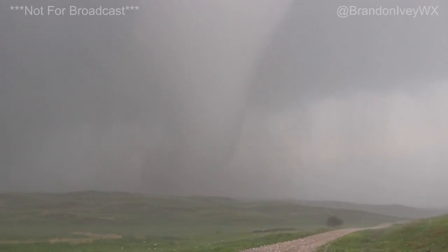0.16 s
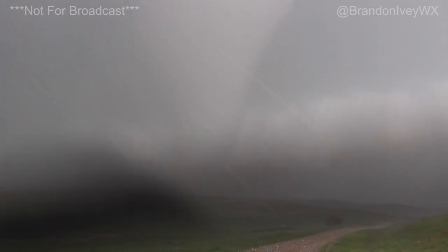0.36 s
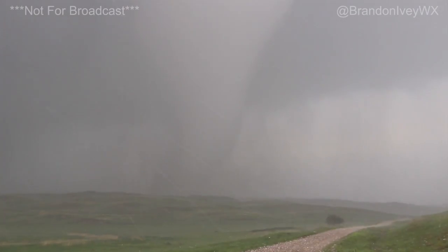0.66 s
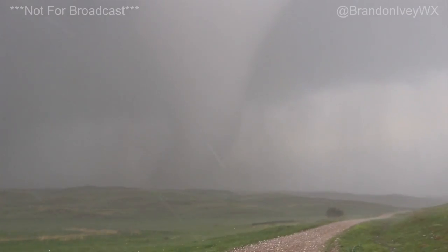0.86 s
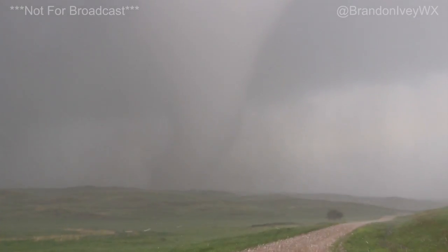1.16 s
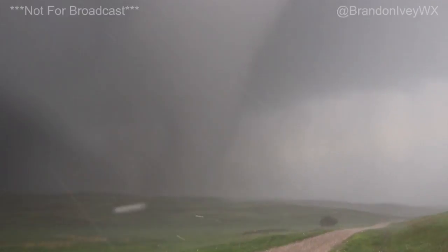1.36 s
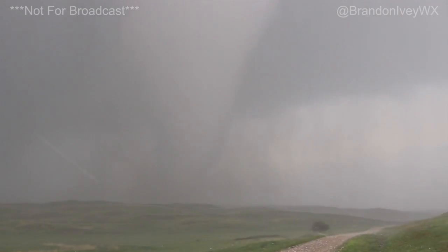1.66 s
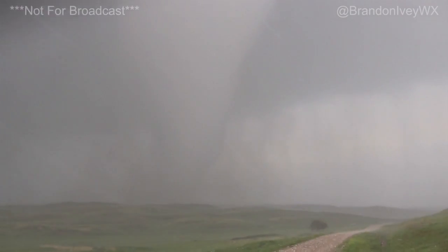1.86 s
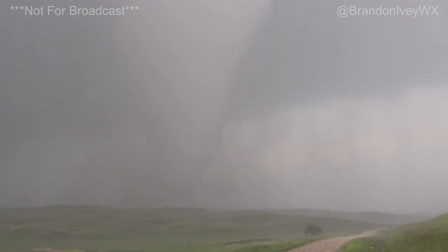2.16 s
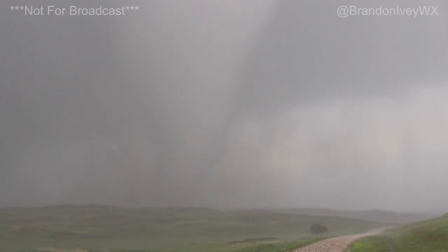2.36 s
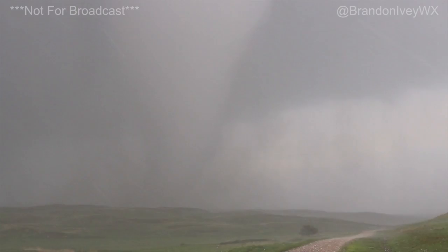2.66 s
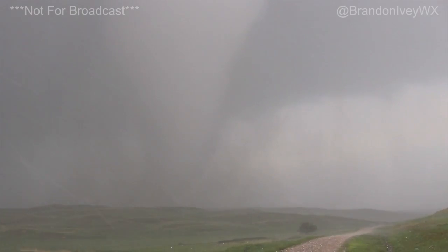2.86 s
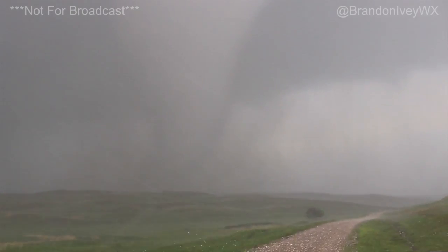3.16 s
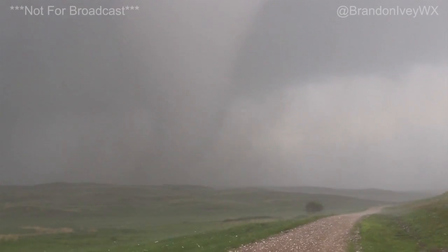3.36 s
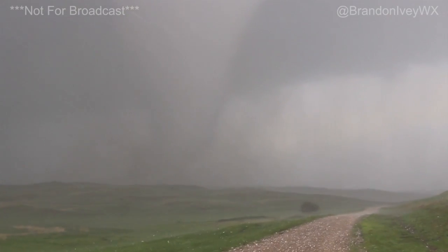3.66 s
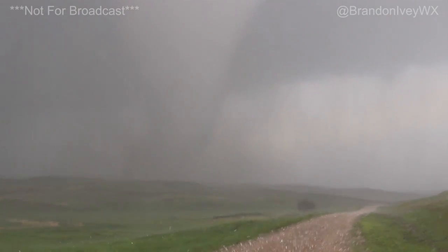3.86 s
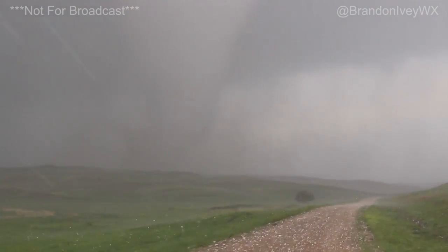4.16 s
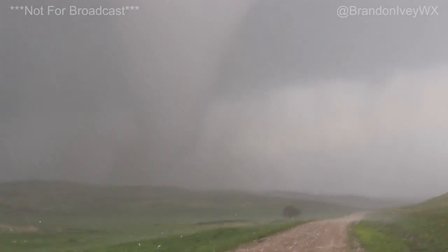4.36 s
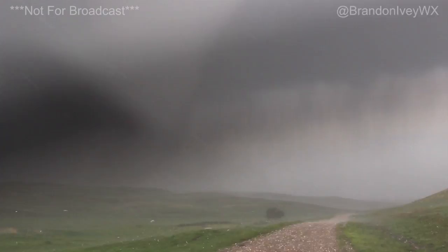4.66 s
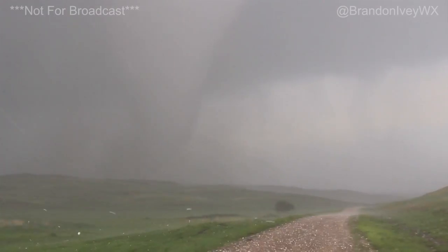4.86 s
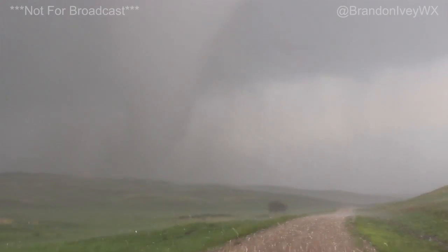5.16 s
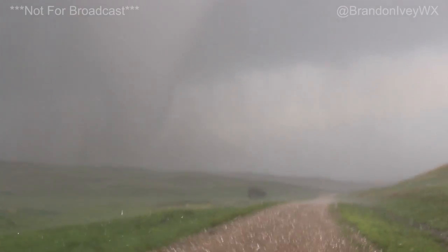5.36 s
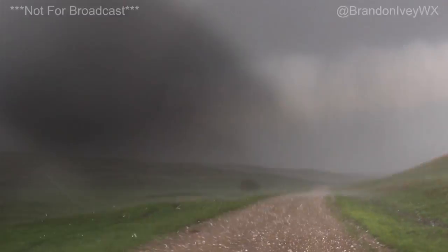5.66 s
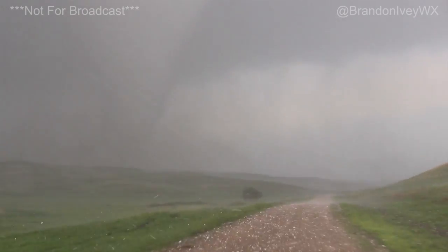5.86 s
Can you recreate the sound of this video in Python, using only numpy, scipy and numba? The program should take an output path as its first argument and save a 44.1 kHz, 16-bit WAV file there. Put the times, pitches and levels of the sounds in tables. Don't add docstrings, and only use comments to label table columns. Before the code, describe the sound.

Inside a parked car during a hailstorm, the microphone sits in the cabin close to the roof and glass. Wind booms low and unsteady from the start, with faint rain patter and wet hiss. Hail hits immediately: a roof knock at 0.0 s, a glass crack near 0.3, then heavy roof bangs around 0.6, 0.7 and 1.0 and a hard glass hit at 1.2. A sparser spell of light ticks follows until sharp strikes at 1.9, 2.2, 2.3 and 2.5. Gusts swell around 3 to 4 s as loud blows land at 3.1, 3.6 and 4.0. At 4.5 a piercing glass crack is among the loudest. More bangs come at 5.2, 5.4 and 5.8, with lighter stones between and a last glass tap at 6.0. Impacts ring briefly and densely; the heaviest thump, clip and momentarily duck the storm.

```python
import sys
import numpy as np
from scipy import signal
from scipy.fft import rfft, irfft
from scipy.io import wavfile
from scipy.ndimage import uniform_filter1d
from numba import njit

SR = 44100
rng = np.random.default_rng(int(sys.argv[2]) if len(sys.argv) > 2 else 0)


def gain_from_db(level_db):
    decades = np.asarray(level_db, float) / 20
    return 10 ** decades


def digitize_waveform(pressure):
    field = np.atleast_2d(pressure).T
    bounded = np.clip(field, -1, 1)
    quanta = np.round(bounded * 32767).astype(np.int16)
    wavfile.write(sys.argv[1], SR, quanta)


N = 265041

# time in seconds, gust level in dB, rainfall level in dB,
# deep buffeting in dB against the gust.
STORM = [(0.0, -22, -42.5, -12), (0.3, -19.5, -41, -3), (0.6, -20.5, -37, -2), (1.0, -18, -35, -7.5),
         (1.4, -23, -42.5, -8), (1.8, -16, -40.5, -4.5), (2.2, -13.5, -34.5, -6.5), (2.55, -16.5, -39, -5),
         (2.95, -10.5, -31, -7), (3.25, -15.5, -29, -7), (3.5, -12.5, -30, -9.5),
         (3.95, -10.5, -34.5, -8.5), (4.4, -14, -31.5, -7.5), (4.8, -19, -45, -3), (5.15, -14, -34.5, -1.5),
         (5.5, -18, -35, -12), (5.75, -17.5, -26.5, -10), (6.01, -21.5, -35, -9)]
# frequency in Hz, width in Hz, level in dB.
CABIN_MODES = [(87.9, 29.2, -3), (138.2, 34.7, -3), (187.8, 42.7, -3.5), (250, 52, -8.0), (391, 260, -15.5)]
# frequency in Hz, width in Hz, level in dB.
DEEP_MODES = [(32.6, 19, -3.5), (51.2, 30, -5)]
# centre in Hz, hits per second, tail in seconds, level in dB.
DROPS = [
    (710, 59, 0.0049, -1),
    (1480, 94, .009, 2),
    (3200, 71, 0.012, 1.5),
    (6300, 52, 0.003, 2),
    (12400, 86, 0.0087, -1.5),
]
# frequency in Hz, level in dB per Hz.
RAIN_COLOUR = [(180, -48), (300, 0.5), (603, -2.5), (686, -17), (1030, -6.5), (2140, -12), (3710, -17.5),
               (14500, -43.5)]

# time in seconds, gain pulled down in dB,
# thump of the cabin in dB.
OVERLOADS = [(0.029, 4.5, -9.5), (0.2867, 5, -31), (0.5591, 4.5, -29), (0.6643, 12.5, -13.5),
             (0.9825, 12, -15.5), (1.1844, 12, -12.5), (1.8881, 2.5, -30), (2.15, 5, -21), (2.2687, 3, -28),
             (2.4882, 4.5, -33), (3.0674, 10, -31), (3.564, 15.5, -20), (4.0138, 9, -20), (4.4902, 15, -17),
             (5.1956, 10, -25), (5.373, 2, -26), (5.7793, 7.5, -24)]
# time in seconds, crack in dB near 3 kHz, thud in dB below 1 kHz,
# snap in dB above 6 kHz, ring length as a share.
ROOF = [(0.030, -9.5, -8.5, -30, 0.99), (0.3291, -17.5, -24.5, -28, 1.15), (0.5586, -5, -5, -19.5, 0.72),
        (0.585, -24.5, -21, -28, 1.1), (0.631, -27, -13.5, -29, 1.9), (0.6662, -2, 0.5, -11, 0.59),
        (0.9684, -13.5, -25.5, -31, 1.15), (0.9824, -2, -2.5, -12.5, 0.45), (1.712, -13, -18.5, -29, 1.24),
        (1.8877, -7.5, -17.5, -8.5, 0.63), (1.948, -22.5, -25.5, -30.5, 1.37), (2.2688, -8, -19, -8, 0.69),
        (2.8626, -17, -17, -29.5, 1.37), (3.023, -16.5, -22, -28, 2.1), (3.4406, -12.5, -28, -23.5, 0.87),
        (3.7618, -25, -22, -41, 1.05), (3.9408, -18, -14, -22, 0.82), (4.0136, -5.5, 2, -20, 0.55),
        (4.3842, -14, -17, -14, 0.98), (4.448, -20.5, -19, -24, 1.6), (4.5856, -12, -21, -21, 0.76),
        (5.1794, -13, -43, -19, 0.51), (5.373, -11, -6, -21.5, 1), (5.4331, -18, -7.5, -33.5, 0.88)]
# time in seconds, crack in dB, thud in dB, snap in dB, panel note in Hz.
PANELS = [(0.1166, -17, -25, -15.5, 1240), (0.149, -26.5, -32, -48, 1270), (0.3637, -22, -33, -29, 1020),
          (0.3995, -14.5, -13.5, -28.5, 1030), (1.5549, -17.5, -19.5, -25, 880),
          (2.15, -3, -15.5, -19, 1200), (2.9004, -21, -40, -20, 800), (3.143, -19.5, -16, -38.5, 820),
          (3.1856, -15, -15, -29.5, 760), (3.2721, -18, -29, -35.5, 1360), (3.476, -20, -21.5, -26, 1030),
          (3.564, -2, -0.5, -23.5, 960), (3.644, -33, -29, -52, 1260), (4.1794, -18, -23.5, -33, 1600),
          (4.2283, -8.5, -12.5, -22, 1400), (4.464, -11, -13.5, -18, 1670), (4.5718, -16, -16.5, -27, 1330),
          (5.022, -16, -15.5, -30.5, 840), (5.0301, -14.5, -14, -34, 1110), (5.1952, -3, -8, -15, 1480),
          (5.3268, -25, -27, -33.5, 1610), (5.6227, -23.5, -25, -41, 800), (5.7794, -5, -7, -10.5, 1060),
          (5.8703, -25.5, -27, -48, 1580)]
# time in seconds, crack in dB, thud in
# dB, snap in dB.
GRAUPEL = [(0.1648, -24, -27.5, -36), (0.5, -26, -24, -50), (0.548, -20, -23, -41),
           (0.7572, -40.5, -52, -43), (0.799, -40, -32.5, -44), (0.8969, -25, -29.5, -36),
           (1.088, -51, -53, -55), (1.325, -47.5, -45.5, -81), (1.515, -35.5, -35, -42),
           (1.8205, -41, -34, -58), (2.0487, -45, -42, -56), (2.218, -27.5, -24, -41),
           (2.7028, -41, -45, -51), (2.722, -28.5, -28, -42), (2.742, -35, -30, -36),
           (2.809, -30.5, -23.5, -51), (2.937, -26, -50, -33), (3.047, -31, -21, -19),
           (3.104, -26, -40, -25), (3.3421, -34, -26, -34.5), (3.548, -28, -46, -31),
           (3.8285, -30.5, -34, -43), (4.129, -34, -50, -40), (4.351, -30, -32, -45),
           (4.372, -20, -50, -41), (4.6724, -28.5, -40, -39.5), (4.837, -41, -29.5, -45.5),
           (5.1035, -34, -31, -35), (5.154, -30, -24.5, -47),
           (0.185, -48, -31, -66), (0.2226, -57, -22.5, -59), (0.949, -35, -29, -62), (2.01, -38, -39, -57),
         (2.298, -26, -34, -38), (2.386, -22, -30, -33), (2.441, -21, -30, -33), (2.6025, -39, -45, -66),
         (2.665, -41, -46, -51), (2.777, -40, -26.5, -57), (3.839, -31.5, -32, -47), (3.979, -42, -25, -46),
         (4.6583, -36, -37, -73), (4.711, -39, -54, -46), (4.748, -46.5, -49, -52), (4.826, -50, -39, -53),
         (4.8976, -44, -27.5, -64), (4.9404, -39, -40, -59), (4.9568, -34, -31, -58),
         (4.999, -38, -31, -50.5), (5.362, -28, -16, -44), (5.756, -34, -37, -32.5), (5.806, -22, -49, -30),
         (5.92, -44, -48, -53), (5.9419, -35, -50, -48)]
# time in seconds, crack in dB, thud in dB, snap in dB, pane note in Hz.
GLASS = [(0.2871, -6, -13, -14.5, 3200), (1.1044, -24, -30, -36, 2600), (1.1842, -5, -8, -9, 3900),
         (1.3798, -29, -42, -34.5, 3200), (1.479, -34.5, -44, -39.5, 2540), (1.7655, -24.5, -36, -36, 4500),
         (1.851, -33, -54, -70, 1600), (2.392, -18.5, -24, -26, 1900), (2.4102, -11, -24, -7, 5130),
         (2.4884, -8, -21.5, -17, 2400), (3.0678, -3, -2.5, -11, 2160), (3.7705, -24, -45, -34, 3200),
         (4.4903, 0, -3.5, -0.5, 3200), (5.47, -30, -27, -40, 3200), (5.495, -32, -45, -38, 4030),
         (5.562, -18.5, -45, -42, 3900), (5.678, -7.5, -12.5, -14.5, 2330), (5.7177, -25, -42, -38, 2520),
         (5.741, -29, -41, -36, 3200), (5.9964, -13.5, -15, -14, 1960)]
# frequency in Hz, time to fall 60 dB in seconds.
RING_T60 = [(300, 0.14), (800, 0.11), (2100, 0.11), (5500, 0.1), (14000, 0.037)]
# frequency in Hz, level in dB.
SPOT_COLOUR = [(400, -10.5), (3000, 7.5), (10000, 11)]

RAIN_TOP_HZ = 14200
MIC_LOW_HZ, MIC_TOP_HZ = 35.6, 16000
DUCK_ATTACK_S, DUCK_RELEASE_S = 0.01, 0.38
THUMP_S = 0.016
SPRAY_DB, SPRAY_S = -28, 0.035

THUD_HZ, CRACK_HZ, SNAP_HZ = 415, 2980, 9600
THUD_DB, CRACK_DB, SNAP_DB = -3.5, -2.5, -8
BELOW_DB, ABOVE_DB = -9, -4.5
MODE_SCATTER_DB = 3.0
RISE_MS, RISE_PER_DB = 0.33, 0.1133
SPOT_SHARE, SPOT_PER_DB, SPOT_PER_DULL_DB = 0.26, 0.86, 0.22
NOTE_DB, NOTE_PER_DB, NOTE_OCTAVES = 5, 0.2531, 0.34
ROOF_NOTE_HZ = 440
ROOF_NOTE, PANEL_NOTE, GLASS_NOTE = 0.79, 1.05, 0.87
SHARE_LOUD, SHARE_PER_DB, SHARE_FAINT_DB, SHARE_PER_DULL_DB = 0.6, 0.03, -17.5, 0.01
PANEL_LONGER, GLASS_SHORTER = 0.047, 0.057


def unit(x):
    return x / np.sqrt(np.mean(x ** 2))


def along(hz, points):
    points = np.asarray(points, float)
    return np.interp(np.log(hz), np.log(points[:, 0]), points[:, 1])


def band(x, hz, width):
    return signal.lfilter(*signal.iirpeak(hz, hz / width, fs=SR), x)


def walk(rate):
    k = int(SR / rate)
    held = np.repeat(rng.standard_normal(N // 100), k)[:N + k]
    slewed = uniform_filter1d(uniform_filter1d(held, k), k)
    return slewed[:N] * np.sqrt(2)


def boom(modes, flutter_db, shared_db):
    out = 0
    for hz, width, db in modes:
        once = band(rng.standard_normal(N), hz, 1.29 * width)
        mode = band(once, hz, 1.29 * width)
        out = out + gain_from_db(db + flutter_db * walk(14.0)) * unit(mode)
    return unit(out * gain_from_db(shared_db * walk(21.86)))


def patter(spread_db=4.5, hiss_db=-2.5, octaves=1.0):
    hz = np.maximum(np.fft.rfftfreq(N, 1 / SR), 1)
    source = gain_from_db(hiss_db) * rfft(rng.standard_normal(N))
    for centre_hz, rate, tail_s, db in DROPS:
        sizes = np.minimum(rng.exponential(size=N), 3)
        ticks = (rng.random(N) < rate / SR) * gain_from_db(spread_db * sizes)
        power = signal.lfilter([1], [1, -np.exp(-1 / tail_s / SR)], ticks ** 2)
        drops = unit(np.sqrt(power) * rng.standard_normal(N))
        surface = np.exp(-(np.log2(hz / centre_hz) / octaves) ** 2)
        source = source + gain_from_db(db) * rfft(drops) * surface
    colour = gain_from_db(along(hz, RAIN_COLOUR)) * (hz < RAIN_TOP_HZ)
    return unit(irfft(source * colour, N))


def ring_share(crack_db, thud_db):
    return SHARE_LOUD - SHARE_PER_DB * max(crack_db, thud_db, SHARE_FAINT_DB)


def hail():
    rows = [(*row, ROOF_NOTE_HZ, ROOF_NOTE, share) for *row, share in ROOF]
    for s, crack, thud, snap, note_hz in PANELS:
        rows.append((s, crack, thud, snap, note_hz, PANEL_NOTE, ring_share(crack, thud) + PANEL_LONGER))
    for s, crack, thud, snap, note_hz in GLASS:
        rows.append((s, crack, thud, snap, note_hz, GLASS_NOTE, ring_share(crack, thud) - GLASS_SHORTER))
    for s, crack, thud, snap in GRAUPEL:
        rows.append((s, crack, thud, snap, ROOF_NOTE_HZ, ROOF_NOTE, ring_share(crack, thud)))
    return rows


@njit
def ring(start, poles, size):
    out = np.zeros(6000)
    for k in range(len(poles)):
        z = start[k]
        for i in range(size):
            out[i] += z.imag
            z *= poles[k]
    return out


def stones():
    table = hail()
    edges = 150 + 15850 * np.linspace(0, 1, 361) ** 1.5
    gap = np.diff(edges)
    t = np.arange(6000) / SR
    out = np.zeros(N + len(t))
    places = rng.random((len(table), len(gap)))
    weights = np.sqrt(2) * np.exp(2j * np.pi * rng.random((len(table), 2, len(gap))))
    scatter_db = MODE_SCATTER_DB * rng.standard_normal(weights.shape) - MODE_SCATTER_DB / 6
    weights = weights * gain_from_db(scatter_db)
    for row, place, (far, near) in zip(table, places, weights):
        s, crack_db, thud_db, snap_db, note_hz, note, share = row
        hz = edges[:-1] + place * gap
        loud_db = max(crack_db, thud_db)
        dull_db = np.clip(loud_db - snap_db - 8, 0, 25)
        share = share + SHARE_PER_DULL_DB * (dull_db - 7.5)
        rise_s = RISE_MS / 1000 * np.exp(RISE_PER_DB * dull_db)

        thud_db, crack_db, snap_db = thud_db + THUD_DB, crack_db + CRACK_DB, snap_db + SNAP_DB
        colour = [(150, thud_db + BELOW_DB - 29), (THUD_HZ, thud_db - 29), (CRACK_HZ, crack_db - 35.5),
                  (SNAP_HZ, snap_db - 39), (16000, snap_db + ABOVE_DB - 39)]
        near_note = np.exp(-(np.log2(hz / note_hz) / NOTE_OCTAVES) ** 2)
        note_db = note * (NOTE_DB + NOTE_PER_DB * dull_db) * near_note
        gain = gain_from_db(along(hz, colour) + note_db) * np.sqrt(gap)
        gain = gain * (hz < RAIN_TOP_HZ + 60 * (snap_db + 55))

        turn = 2j * np.pi * hz / SR
        loss = np.log(1000) / (along(hz, RING_T60) * np.clip(share, 0.3, 2.5) * SR)
        cabin = ring(gain * far, np.exp(turn - loss), size=5500)
        spot_db = along(hz, SPOT_COLOUR) + SPOT_PER_DB * loud_db - SPOT_PER_DULL_DB * (dull_db - 4.5)
        spot = ring(gain * gain_from_db(spot_db) * near, np.exp(turn - loss / SPOT_SHARE), size=1200)
        i = int(s * SR)
        out[i:i + len(t)] += (cabin + spot) * (1 - np.exp(-(t / rise_s) ** 2))
    return out[:N]


def fading(events, tail_s):
    t = np.arange(N) / SR
    power = np.zeros(N)
    for s, db in events:
        i = int(s * SR)
        power[i:i + SR] += gain_from_db(2 * db) * np.exp(-2 * t[:min(SR, N - i)] / tail_s)
    return np.sqrt(power)


def ducking():
    t, out = np.arange(N) / SR, np.zeros(N)
    for s, pull_db, _ in OVERLOADS:
        since = np.maximum(t - s, 0)
        out -= pull_db * (1 - np.exp(-since / DUCK_ATTACK_S)) * np.exp(-since / DUCK_RELEASE_S)
    return out


def scene():
    s, *columns = np.transpose(STORM)
    gust_db, rain_db, deep_db = (np.interp(np.arange(N) / SR, s, c) for c in columns)
    duck_db = ducking()
    gust, rain = gain_from_db(gust_db + duck_db), gain_from_db(rain_db + duck_db)
    thump = fading([(s, db) for s, _, db in OVERLOADS], THUMP_S)
    spray = fading([(s, crack_db + SPRAY_DB) for s, crack_db, *_ in hail()], SPRAY_S)
    wind = np.hypot(gust, thump) * boom(CABIN_MODES, flutter_db=1.88, shared_db=1.77)
    buffeting = gust * gain_from_db(deep_db) * boom(DEEP_MODES, flutter_db=0.6, shared_db=1.7)
    drops = np.hypot(rain, spray) * patter()
    return (wind + buffeting + drops + stones())[None]


def band_limit(x):
    return signal.sosfilt(signal.butter(12, 16300, fs=SR, output="sos"), x)


def record(dry):
    low_cut = signal.butter(3, MIC_LOW_HZ, "high", fs=SR, output="sos")
    top_cut = signal.ellip(8, 0.2, 60, MIC_TOP_HZ, fs=SR, output="sos")
    heard = signal.sosfilt(top_cut, signal.sosfilt(low_cut, dry))
    mix = np.clip(heard, -1, 1)
    return band_limit(mix)


dry = scene()
out = record(dry)
digitize_waveform(out)
```